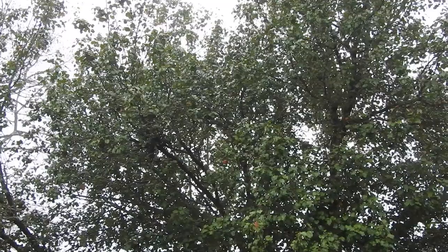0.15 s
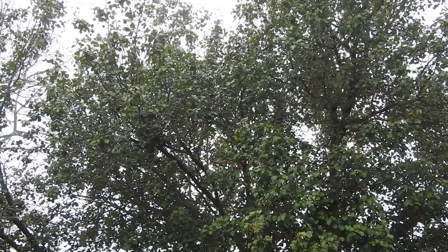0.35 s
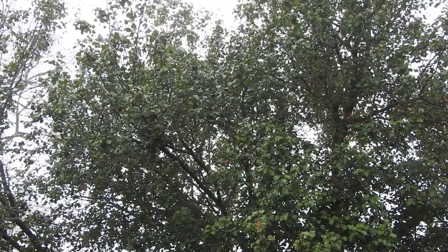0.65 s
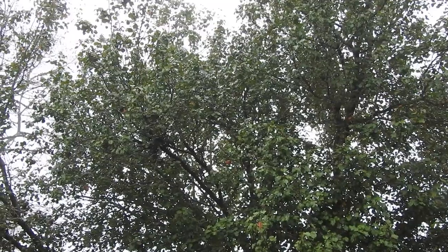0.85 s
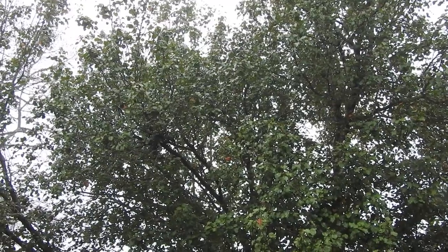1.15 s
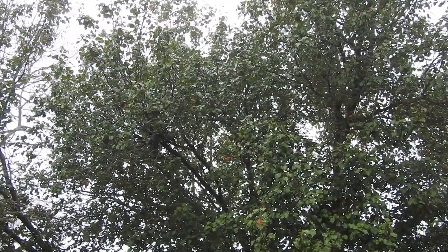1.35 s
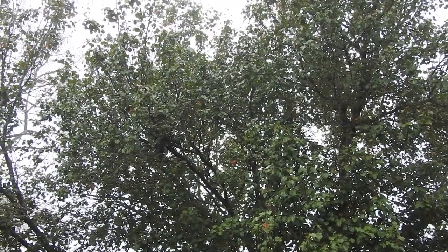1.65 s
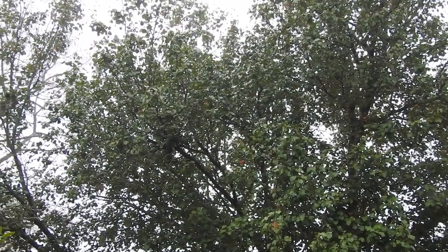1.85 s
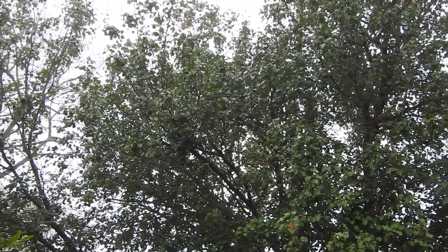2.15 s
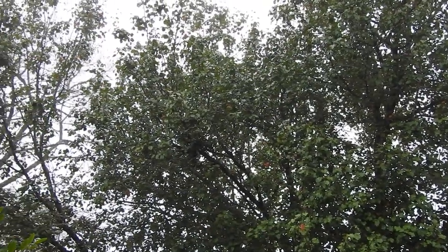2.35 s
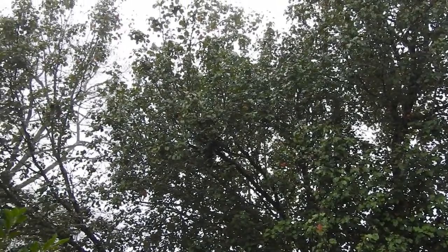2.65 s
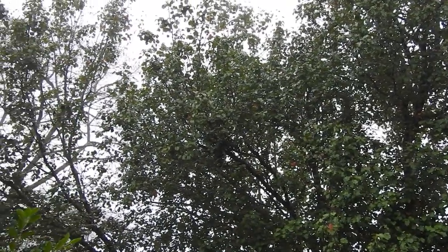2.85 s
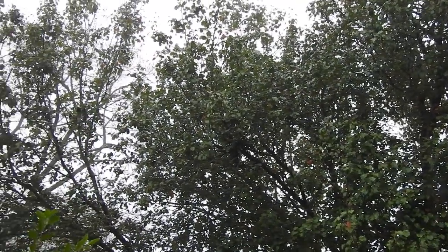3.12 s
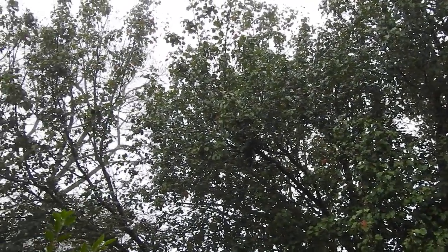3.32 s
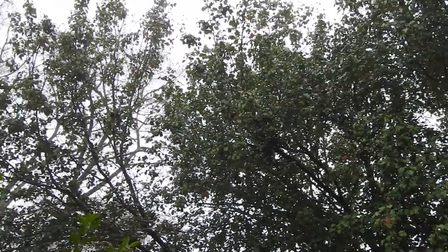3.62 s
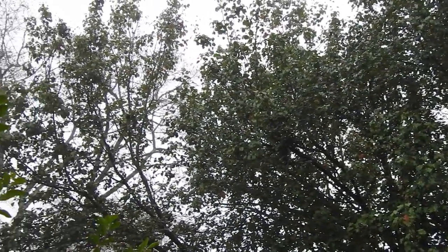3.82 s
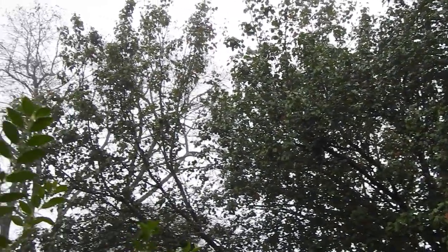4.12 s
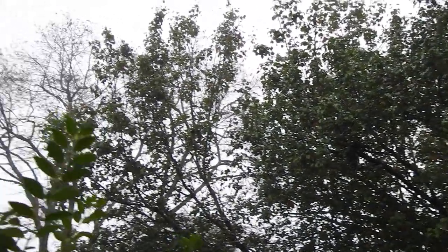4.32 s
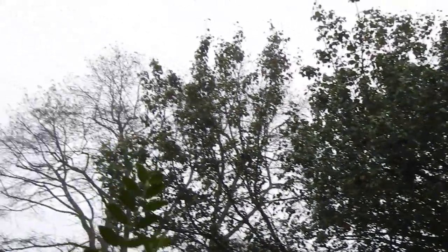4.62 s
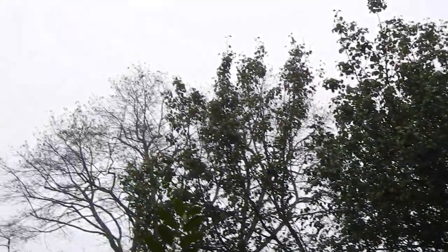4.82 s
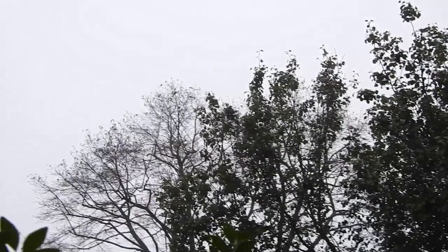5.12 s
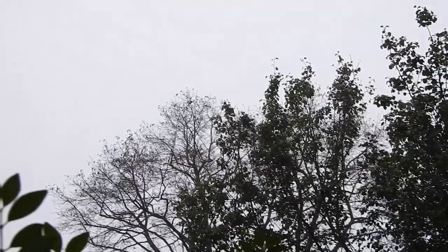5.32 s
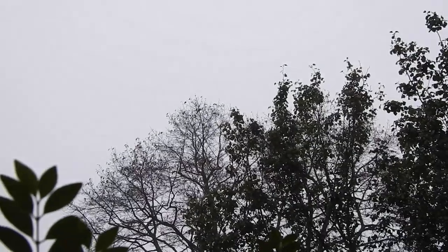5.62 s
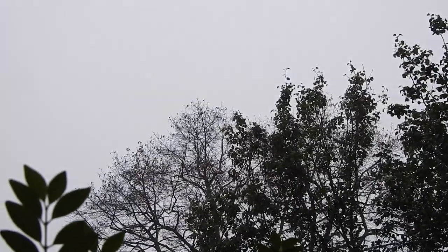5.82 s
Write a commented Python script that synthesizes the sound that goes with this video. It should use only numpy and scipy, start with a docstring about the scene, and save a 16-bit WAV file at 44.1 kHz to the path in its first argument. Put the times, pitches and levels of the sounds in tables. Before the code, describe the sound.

Jays screech in leafy treetops. One softer call is already sounding at the start, then a pause with faint twig ticks and tiny high cheeps. From about 1.5 seconds, harsh screams follow quickly, often overlapping, each about a third of a second and falling raspily. Trunks and leaves add close echoes and a thin tail. Far traffic hums under faint hiss; stereo outdoor microphone at some distance.

```python
"""Jays scream in turns and over each other in the tree tops, the first call already under way. Each call is a
harmonic series, coloured by a throat resonance, that jumps up, arches and sags, turning raspy as it falls.
Trunks and leaves return near echoes and a long thin tail, made by convolution with shaped noise and impulses.
Behind them, filtered noise makes a far traffic hum, a wash, a swelling low drone and a faint hiss; a small
bird cheeps in sine tones, twigs tick in decaying noise, and one low thump sounds as a damped sine."""
import sys
import numpy as np
from scipy import signal
from scipy.fft import rfft, irfft, next_fast_len
from scipy.io import wavfile
from scipy.ndimage import uniform_filter1d, minimum_filter1d, map_coordinates

SR = 44100
rng = np.random.default_rng(int(sys.argv[2]) if len(sys.argv) > 2 else 0)


def dump_mix(stems):
    """Bounce the given channels to the path in sys.argv[1] as a 16-bit WAV at rate SR."""
    frames = np.atleast_2d(stems).T  # one column per channel
    limited = np.clip(frames, -1, 1)  # hard clip at full scale
    pcm = np.round(limited * 32767).astype(np.int16)
    wavfile.write(sys.argv[1], SR, pcm)


N = 263277  # length in samples

# The calls, one row each: start_s, length_s, crest_s (after the start), opening_hz (before the scoop), crest_hz,
# closing_hz, steady (share of the fall, 0-1), bend (power of time in the steady fall), level_db (4th partial at
# the crest), swell_db (its change back to the opening), fade_db (its change to the close), then against the 4th:
# second_db, third_db, fifth_db, sixth_db, seventh_db, eighth_db; dull_start, dull_end (dulling, 0-2), rasp (0-1),
# fall_rasp (added in the fall, 0-1), doubling (strong-weak alternation, 0-1), echo_db (tail against direct),
# pan_db (left over right), lead (left ahead of right, samples)
CALLS = [ (0, .315, .18, 928.5, 896.4, 742, .85, .7, -29, 2, -4, -26.5, -15, -22, -19, -9, -19.5, 0.53, 0.17, 0.14, 0.27, .1, -0.5, 3, 3),
         (1.482, .33, 0.085, 862, 905.5, 786, 0.8, 1.18, -32.5, -2, -1.5, -20.5, -11, -19, -15, -8, -17.5, 0.63, 0.23, 0.024, 0.28, .05, -1, 3.5, -3.5),
         (1.876, 0.37, 0.13, 893.3, 916.8, 757, 0.87, 1.43, -14, -5.5, -4, -21.5, -15.5, -18.5, -8.5, -2.5, -8, 0.51, 0.3, .01, 0.25, 0.25, -9, -.5, -0.7),
         (2.507, 0.34, .083, 864, 901, 718.5, 0.66, 1.06, -20, 1.5, 1.5, -21.5, -14.5, -16, -12.5, -9.5, -6, 1, 1.28, 0.039, .3, 0.23, -0.5, 0.5, 0.65),
         (2.782, 0.33, .133, 875, 907, 734, 0.68, 0.92, -18, 2.5, -2, -22.5, -16, -13.5, -7.5, -2, -5.5, 0.76, 0.21, 0.044, .3, 0.21, -3, -1.5, -0.3),
         (2.903, 0.37, 0.054, 892, 917, 726.7, .53, 0.71, -18.5, 10.5, 2, -25, -18, -23.5, -16, -5, -6.5, 0.33, 1.06, 0.058, 0.24, 0.033, -22, 2, 0.95),
         (3.197, 0.33, 0.074, 898, 879.7, 694, .3, 0.89, -18.5, 1, 1.5, -29.5, -20, -17, -16, -14, -9, 0.72, 1.1, 0.024, 0.29, 0.033, -6, 0.5, 0.4),
         (3.56, .41, 0.066, 850, 892, 718, 0.89, 1.75, -25, 9, 7.5, -24.5, -9.5, -14.5, -9, -6, -1.5, 0.55, 1.4, 0.034, 0.32, .08, 0, 0.2, 0.6),
         (3.7, 0.33, 0.11, 846.5, 905.5, 746, .66, 0.8, -16, -2, -4.5, -20.5, -17.5, -14, -9, -4, -7, .9, 0.37, .04, 0.33, 0.21, -9.5, 0, 0.8),
         (4.017, .362, .07, 872, 890.3, 694.5, 0.77, 1.16, -18.5, 5, -2, -23, -15.5, -18.5, -10.5, -13, -6, 1.2, 0.74, 0.055, 0.4, 0.061, -7.5, 0.5, 1.04),
         (4.415, .4, 0.074, 882, 887, 719, 0.71, 1.58, -19.5, 3.5, -3, -21, -11.5, -20.5, -12, -10, -5, 0.27, 0.75, .04, 0.29, 0.45, -11.5, -0.5, 1),
         (4.469, 0.32, 0.12, 883.4, 900.4, 723.7, 0.69, 1.32, -17.5, 1.5, -0.5, -22, -20, -20.5, -10, -2, -7.5, 0.39, 0.58, 0.029, 0.28, 0.074, -8.5, -0.5, 0.8),
         (4.846, 0.35, 0.092, 845, 872, 701, 0.53, 1.085, -14, -2, -6.5, -25.5, -19.5, -21.5, -16.5, -16.5, -9.5, 0.27, 0.41, 0.03, 0.4, 0.04, -11, -.5, 1.27),
         (5.306, 0.32, .13, 846, 904.7, 759, 0.83, 0.74, -18.5, 2.5, 2.5, -20, -14, -11.5, -8, 0, -2, 0.98, 0.58, 0.08, 0.29, 0.05, -8.5, -1.1, -1.5),
         ]


def jays():
    """Superposition: calls add linearly, each along its own paths through the branches."""
    out = np.zeros((2, N + 2 * SR))
    for start, *shape, doubling, echo_db, pan_db, lead in CALLS:
        call = scream(start, shape, doubling, scoop=0.02, release=0.019)  # scoop and release in s
        heard = among_trees(call, echo_db, pan_db, lead)
        out[:, round(start * SR):][:, :heard.shape[1]] += heard
    return out[:, :N]


# Throat resonance, rising to one broad peak near 6600 Hz: frequency_hz, gain_db
THROAT_RESONANCE = [(700, -50.5), (1700, -27.5), (2600, -10), (3300, -6.5), (4400, -4), (5400, -2),
                    (6600, 7.5), (7600, -6.5), (9000, -17.5), (10500, -36.5), (12000, -37), (15000, -61.5)]


def scream(start, shape, doubling, scoop, release):
    """Source and filter: membrane pulses as a harmonic series, coloured by the throat resonance."""
    underway = ATTACK_S * (start == 0)  # a call at time 0 is already past its attack
    t = np.arange(0, shape[0] + release - underway, 1 / SR)
    hz, levels_db, rasp = gesture(t + underway, *shape)
    rasp = np.clip(rasp, 0, .45)

    # the pitch scoops up while the membranes tighten
    slack = np.clip(1 - (t + underway) / scoop, 0, 1)
    rising = np.clip((t[np.argmax(hz)] + 0.017 - t) / 0.091, 0, 1)
    hz = hz * (1 - .28 * slack ** 1.4)
    uneven_hz = hz * (1 + 0.0438 * rasp * wobble(250, size=len(t)))  # rasp: uneven cycle lengths
    phase = 2 * np.pi * np.cumsum(uneven_hz) / SR

    # levels hold at the crest; falling partials slide along the throat resonance
    k = np.arange(1, 18)[:, None]  # partial numbers
    known = np.array([2, 3, 4, 5, 6, 7, 8])
    drive_db = np.array(levels_db) - along(THROAT_RESONANCE, known[:, None] * hz.max())
    spread = np.transpose([np.interp(k[:, 0], known, one) for one in np.eye(len(known))])
    upper = np.clip(k / 7 - .25, 0, 1)  # weight of the upper partials
    # single upper partials waver at random
    waver_db = 3 * upper * [wobble(14, size=len(t)) for _ in k]
    gain = amp(along(THROAT_RESONANCE, k * hz) + spread @ drive_db + waver_db)
    partials = np.sqrt(2) * gain * np.sin(k * phase + rng.uniform(0, 2 * np.pi, k.shape))

    # uneven pulse edges shake the upper partials
    flutter = 2.53 * (rasp + 0.17 * slack) * wobble(800, size=len(t))
    # alternate strong and weak cycles put lines halfway between the partials
    halves = 2 * doubling * rising * np.cos(phase / 2)
    tone = np.sum(partials * (1 + upper * (flutter + halves)), axis=0)
    fade_out = np.clip((t[-1] - t) / release, 0, 1) ** 2
    return tone * (1 - slack ** 2.94) * fade_out


# Level swells in at the attack and sinks at the close
ATTACK_S, ATTACK_DB, CLOSE_S, CLOSE_DB = 0.029, -17, 0.041, -4.5
PLUNGE_BEND = 5  # power of time after the crest for the pitch drop at the end
# Added rasp in the attack and at the close; power of time for its growth in the fall
HOARSE_START, HOARSE_END, HOARSE_BEND = 0.49, 0.24, 0.92
TREMOR_DB, TREMOR_PER_S = 2.5, 54.8  # the level shakes as the call falls; size grows to this, knots a second
# Half-closed beak at the opening, partials 2 to 8: change_db per unit of dull_start
OPENING_BEAK_DB = [5.5, -1.5, -3, -1, 3, -17.5, -21.5]
# The same as the pitch falls, partials 2 to 8: change_db per unit of dull_end
CLOSING_BEAK_DB = [5.5, -3.2, 0, 7.5, -2, -8, -16.5]
# Random wavering of partials 2 to 8, as when echoes interfere: sway_db
PARTIAL_SWAY_DB = [2.3, 2.14, 0.5, 4.9, 2.65, 2.36, 1.08]


def gesture(t, length, crest, opening_hz, crest_hz, closing_hz, steady, bend, db, swell_db, fade_db,
            second_db, third_db, fifth_db, sixth_db, seventh_db, eighth_db, dull_start, dull_end, rasp, fall_rasp):
    """Modulation of pitch, partial levels and rasp: arch up to the crest, then fall, dull and roughen."""
    up = np.clip(1 - t / crest, 0, 1)
    down = np.clip((t - crest) / (length - crest), 0, 1)
    fall = steady * down ** bend + (1 - steady) * down ** PLUNGE_BEND
    hz = crest_hz - (crest_hz - opening_hz) * up ** 2 - (crest_hz - closing_hz) * fall

    attack = np.clip(1 - t / ATTACK_S, 0, 1)
    close = np.clip(1 - (length - t) / CLOSE_S, 0, 1)
    level_db = db + swell_db * up + fade_db * down + ATTACK_DB * attack ** 2 + CLOSE_DB * close ** 1.14
    level_db = level_db + TREMOR_DB * np.sqrt(down) * wobble(TREMOR_PER_S, size=len(t))

    parts_db = [second_db, third_db, 0, fifth_db, sixth_db, seventh_db, eighth_db]
    levels_db = []
    for part, first, last, sway in zip(parts_db, OPENING_BEAK_DB, CLOSING_BEAK_DB, PARTIAL_SWAY_DB):
        dulling_db = first * dull_start * up ** 1.56 + last * dull_end * fall
        levels_db.append(level_db + part + dulling_db + sway * wobble(15.6, size=len(t)))

    hoarse = HOARSE_START * np.clip(1 - t / .045, 0, 1) + HOARSE_END * close
    return hz, levels_db, rasp + hoarse + fall_rasp * down ** HOARSE_BEND


# Near echoes from trunks: delay_s (varied by a fifth either way), level_db (against direct sound)
TRUNK_ECHOES = [(.006, -5.5), (.017, -6.5), (.033, -12.5)]
# Decay of the far leaves: frequency_hz, t60_s
FAR_LEAVES_DECAY = [(1000, 4), (3500, 1.86), (7000, 1.28), (12000, 0.084)]
# Near leaves scatter treble most: frequency_hz, level_db (before a gain of 5)
LEAF_SCATTER = [(1500, -10), (3500, -4), (5500, 1), (8000, 3), (12000, 2)]


def among_trees(call, echo_db, pan_db, lead):
    """Convolution with an impulse response: direct sound, trunk echoes and a tail decaying by frequency."""
    hz, t, z = signal.stft(rng.standard_normal((2, SR)), SR, nperseg=256)
    far = amp(-60 * t / along(FAR_LEAVES_DECAY, hz)[:, None])
    near = 5 * amp(along(LEAF_SCATTER, hz)[:, None] - 60 * t / 0.28)  # t60 0.28 s
    turn = mid_side_angle(hz, raised=0.082)[:, None]
    z = np.cos(turn) * z[0] + np.sin(turn) * np.array([z[1], -z[1]])
    tail = signal.istft(z * (far + near), SR, nperseg=256)[1][:, :SR]
    paths = amp(echo_db) * tail / np.linalg.norm(tail[0])

    left_right = np.array([[1], [-1]])
    # direct sound: a fractional delay per side
    paths[:, :32] += np.sinc(np.arange(32) - 16 + lead / 2 * left_right)
    for delay, db in TRUNK_ECHOES:
        # arrival in samples, a little different per side
        arrival = delay * SR * rng.uniform(.8, 1.2) + rng.normal(0, 1.2, 2)
        paths[[0, 1], arrival.astype(int)] += amp(db)
    paths = paths / np.linalg.norm(paths[0]) * amp(pan_db / 2 * left_right)
    return signal.fftconvolve(call[None], paths, axes=1)


def lingering():
    """Reverberant decay: echoes of a call just over, as noise with a fast and a slow exponential."""
    t = np.arange(N) / SR
    fast = amp(-27.5 - 60 * t / 0.085)
    slow = amp(-34.5 - 60 * t / 1.42)
    return (fast + slow) * rush(THROAT_RESONANCE, patchy_db=2.5)


# Far small bird: start_s, length_s, pitch_hz, level_db (peak)
SMALL_BIRD = [(.72, 0.062, 5200, -74), (1.025, .025, 4950, -57), (1.114, 0.042, 5400, -54),
              (1.477, 0.042, 5280, -49)]


def cheeps():
    """Pure tones: short sine whistles under half-sine envelopes."""
    t = np.arange(N) / SR
    out = np.zeros(N)
    for start, length, hz, db in SMALL_BIRD:
        envelope = np.sin(np.pi * np.clip((t - start) / length, 0, 1))
        out += amp(db) * envelope * np.sin(2 * np.pi * hz * t)
    return out


# Twigs: start_s, level_db (of the noise before its band filter)
TWIG_TICKS = [(0.3606, -30), (0.845, -30)]
# Low thump: start_s, level_db (before its soft onset and a gain of 3), pitch_hz, t60_s
LOW_THUMP = [(5.559, 0.5, 141, 0.022)]


def knocks():
    """Impulsive excitation: treble ticks as decaying band noise, the thump as a damped sine."""
    out, t = np.zeros(N + SR), np.arange(SR // 4) / SR
    for start, db in TWIG_TICKS:
        out[round(start * SR):][:len(t)] += amp(db - 60 * t / .035) * rng.standard_normal(len(t))
    # bell-shaped band round 5800 Hz on an octave scale
    ticks = filtered(out[:N], lambda hz: amp(-24 * (np.log2(hz / 5800 + 1e-9) / 0.55) ** 2))
    out = np.pad(ticks, (0, SR))
    for start, db, hz, t60 in LOW_THUMP:
        onset = (1 - np.exp(-t / 0.0051)) ** 2
        out[round(start * SR):][:len(t)] += amp(db - 60 * t / t60) * onset * 3 * np.sin(2 * np.pi * hz * t)
    return out[:N]


# Low drone: start_s, length_s, level_db (rms at the top of the swell)
DRONE_SWELLS = [(1.192, 0.3, -56.5), (2.296, 0.66, -53), (2.728, 0.15, -52), (3.245, 0.22, -83),
                (3.809, .35, -48.5), (4.627, 2.3, -56.5)]


def drone():
    """Amplitude modulation: noise in one narrow low band swells up a few times."""
    t = np.arange(N) / SR
    swells = np.zeros(N)
    for start, length, db in DRONE_SWELLS:
        swells += amp(db) * np.sin(np.pi * np.clip((t - start) / length, 0, 1) ** .7)
    band = [(200, -83), (260, 0), (295, -1), (330, -23), (420, -75.5)]  # frequency_hz, relative level_db
    return swells * rush(band, patchy_db=1.2)


# Far traffic spectrum: frequency_hz, relative level_db (per Hz)
TRAFFIC_SPECTRUM = [(12, -79), (20, -51.5), (36, -15), (54, -8), (71, -5.5), (124, 3), (146, -3.5),
                    (228, -9.5), (375, -63.5), (420, -35.5), (550, -41), (920, -120)]
# Mid wash spectrum: frequency_hz, relative level_db (per Hz)
WASH_SPECTRUM = [(180, -19.5), (300, -1), (374, -6), (635, -5), (686, -3), (834, -1.5), (1780, -10.5),
                 (2300, -12.5), (2990, -88), (5060, -120)]
# Level of the wash over time: time_s, level_db (rms)
WASH_LEVEL = [(0.0, -51), (0.611, -53), (3.188, -49), (4.638, -48), (5.009, -40.5), (5.35, -48),
              (5.97, -46.5)]
# Hiss spectrum: frequency_hz, relative level_db (per Hz)
HISS_SPECTRUM = [(1180, -58), (2000, -46.5), (2210, -23.5), (2450, -8.5), (2640, -5), (3670, -12),
                 (3960, -4), (4770, -0.5), (5830, -7.5), (6570, 5), (7840, -21), (10400, -20),
                 (15000, -30.5)]
HUM_DB, HISS_DB = -43, -53.5  # rms; the hiss drifts around its level


def air():
    """Spectral shaping of noise: far traffic hum, a mid wash and a thin hiss."""
    times, levels_db = np.transpose(WASH_LEVEL)
    wash_gain = amp(np.interp(np.arange(N) / SR, times, levels_db))
    hum = amp(HUM_DB) * rush(TRAFFIC_SPECTRUM, patchy_db=1.2)
    wash = wash_gain * rush(WASH_SPECTRUM, patchy_db=1.2)
    hiss = amp(HISS_DB + wobble(1, size=N)) * rush(HISS_SPECTRUM, patchy_db=1.2)
    return hum + wash + hiss


def rush(spectrum, patchy_db):
    """Partly coherent noise: a stereo pair of rms 1, with patches of random gain in time and frequency."""
    z = signal.stft(rng.standard_normal((2, N + 512)), nperseg=512)[2]
    field = uniform_filter1d(rng.standard_normal(z.shape[1:]), size=6, axis=0)
    field = uniform_filter1d(field, size=14, axis=1)
    pair = signal.istft(z * amp(patchy_db * unit(field)), nperseg=512)[1][:, :N]

    def response(hz):
        turn = mid_side_angle(hz)
        return amp(along(spectrum, hz)) * [np.cos(turn), np.sin(turn)]

    mid, side = filtered(pair, response)
    return unit(np.array([mid + side, mid - side]))


# Likeness of left and right: frequency_hz, coherence (0-1)
LEFT_RIGHT_LIKENESS = [(60, 0.99), (180, 0.96), (550, 0.9), (1650, 0.86), (4970, 0.39), (15000, 0.076)]


def mid_side_angle(hz, raised=0):
    """Interchannel coherence: the angle that mixes mid and side to the wanted left-right likeness."""
    return np.arccos(np.clip(along(LEFT_RIGHT_LIKENESS, hz) + raised, -1, 1)) / 2


def amp(db):
    """Decibel law: the gain of a dB value."""
    return 10 ** (np.asarray(db) / 20)


def unit(x):
    """Normalisation: x scaled to rms 1."""
    return x / np.sqrt(np.mean(x ** 2) + 1e-20)


def along(points, hz):
    """Logarithmic frequency scale: (Hz, value) points interpolated at hz."""
    f, v = np.transpose(points)
    return np.interp(np.log(hz + 1), np.log(f + 1), v)


def wobble(rate, size):
    """Band-limited randomness: a smooth curve through rate random knots a second."""
    knots = rng.standard_normal(int(size * rate / SR) + 4)
    return map_coordinates(knots, [np.arange(size) * rate / SR])


def filtered(x, response):
    """Linear filtering: the spectrum of x times a response of frequency."""
    m = next_fast_len(N + SR // 2)
    return irfft(rfft(x, m) * response(np.fft.rfftfreq(m, 1 / SR)), m)[..., :N]


def scene():
    """Superposition of birds, background and knocks."""
    return jays() + lingering() + air() + drone() + cheeps() + knocks()


CEILING, LOOK_AHEAD = .9, 90  # limiter: top level before the band limit, samples
TOP_HZ = 15650  # band limit


def record(dry):
    """Peak limiting by a smoothed gain, shared by both sides, then a sharp low-pass at the band limit."""
    need = np.minimum(1, CEILING / (np.abs(dry).max(axis=0) + 1e-9))
    gain = uniform_filter1d(minimum_filter1d(need, size=2 * LOOK_AHEAD), size=LOOK_AHEAD)
    return filtered(dry * gain, lambda hz: hz < TOP_HZ)


dry = scene()
out = record(dry)
dump_mix(out)
```